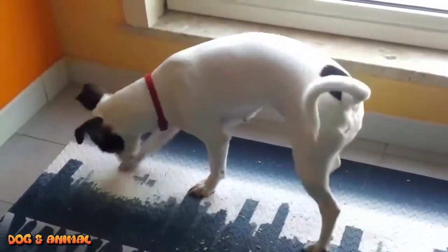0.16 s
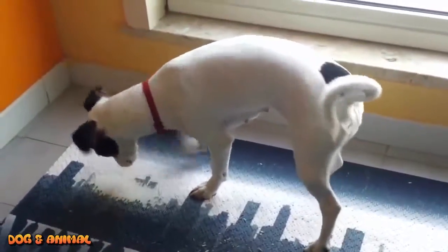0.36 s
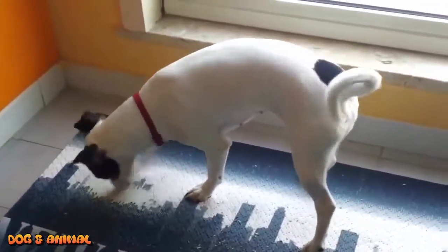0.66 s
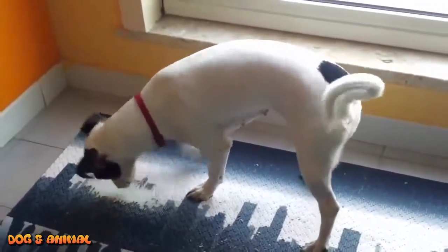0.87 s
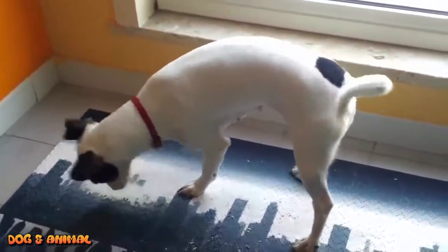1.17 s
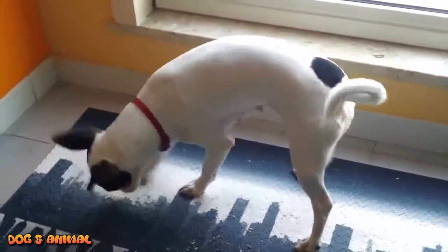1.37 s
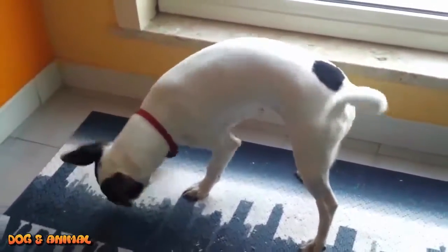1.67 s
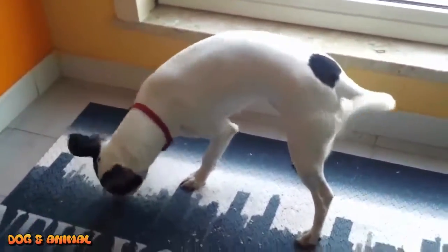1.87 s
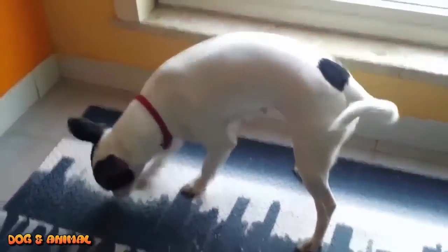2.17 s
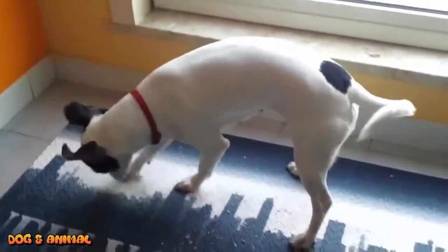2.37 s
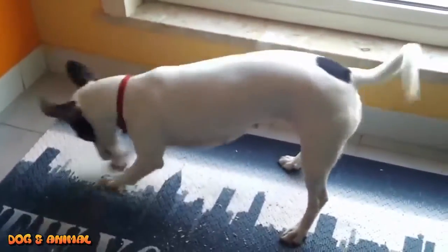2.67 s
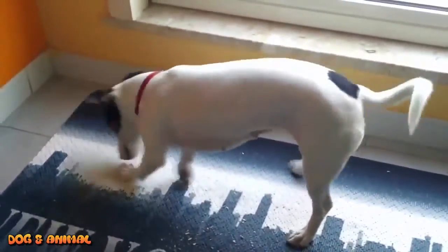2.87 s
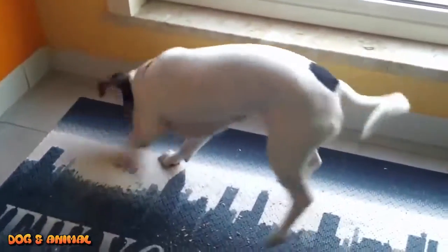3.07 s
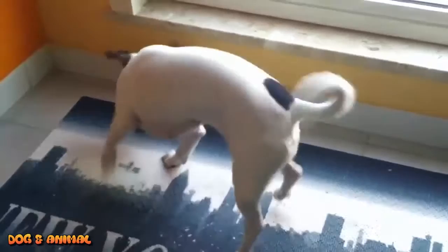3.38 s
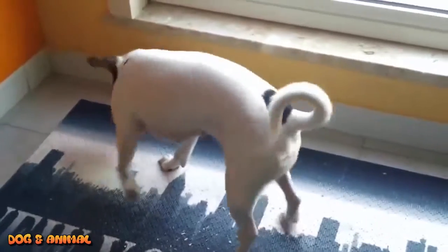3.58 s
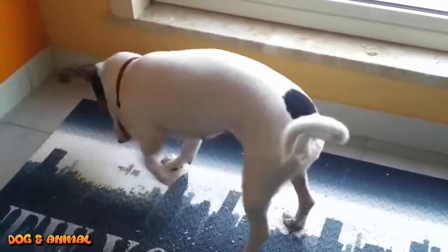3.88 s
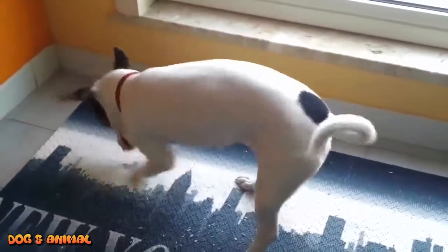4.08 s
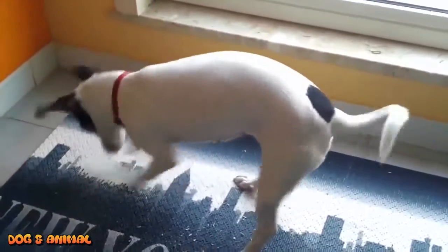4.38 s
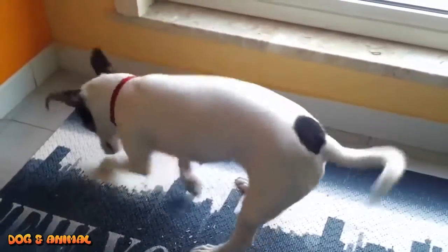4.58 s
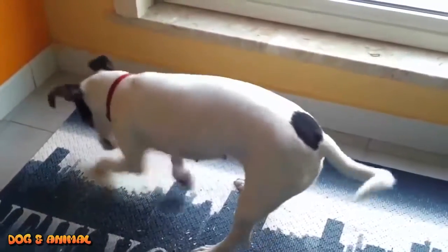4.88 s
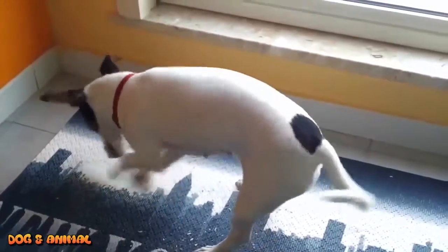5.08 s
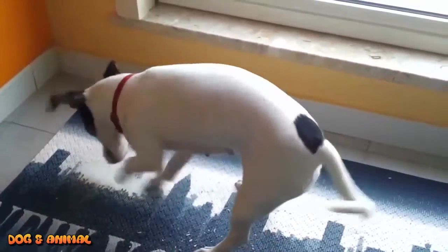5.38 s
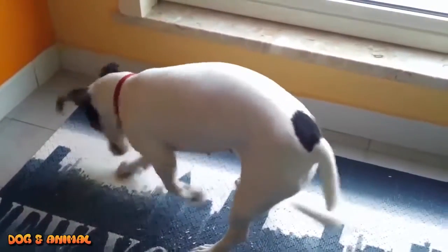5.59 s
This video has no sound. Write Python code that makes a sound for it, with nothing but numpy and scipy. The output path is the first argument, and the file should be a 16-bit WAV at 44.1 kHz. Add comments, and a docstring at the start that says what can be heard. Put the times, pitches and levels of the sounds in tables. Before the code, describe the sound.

A small dog scratches at a bristly doormat close by in a tiled room. From the start until about 2.7 seconds, hard single strokes come evenly, three or four a second. Each is a bright crackling drag that ends in a rasp and a sharp snap as the claws tear free, some with a short hoarse zip. Around 3 seconds the strokes turn a little lighter and less even, and a very faint, thin, high squeak glides upward at about 3.2 seconds. From roughly 4.4 seconds both paws alternate in a quick scrabble, about twice as fast, ending with a firmer rasping stroke near 5.7 seconds. Underneath, the pads rub with a quiet hollow sound, the mat knocks dully on the tiles now and then, and paws land softly around the first second and near 4 seconds. The walls add a short echo over a faint steady hush.

```python
"""The corner of a tiled room: a small dog digs at a bristly doormat, in single hard strokes at first,
then with both paws in turn. Each paw drags through the crackling pile until the claws tear free with
a snap; deep strokes rasp and zip over the weave. Underneath, the pad rubs with a hollow sound, the mat
knocks back on the tiles and a paw lands with a soft thud. The near walls ring briefly over a faint
hush, and one thin squeak slips out midway."""
import sys
import numpy as np
from scipy import signal
from scipy.fft import rfft, irfft, next_fast_len
from scipy.io import wavfile
from scipy.ndimage import uniform_filter1d

SR = 44100
rng = np.random.default_rng(int(sys.argv[2]) if len(sys.argv) > 2 else 0)


def generate_wav(signal):
    """Clip the signal to [-1, 1] and save it as 16-bit WAV at the path in sys.argv[1]."""
    frames = np.transpose(np.atleast_2d(signal))
    scaled = np.clip(frames, -1, 1) * 32767
    pcm = np.round(scaled).astype(np.int16)
    wavfile.write(sys.argv[1], SR, pcm)


N = 253218
TIME = np.arange(N) / SR

# paw strokes: (tear time [s], drag length [s], drag [dB], tear [dB], scuff [dB], rasp [dB], snap [dB])
PAW_STROKES = [(.049, 0.07, -43.5, -58, -82, -77, -53), (.121, 0.033, -37.5, -30, -51, -44, -11),
               (.447, 0.087, -38.5, -24.5, -45, -35, -6), (0.7136, 0.053, -34, -26.5, -49.5, -24.5, -3.5),
               (1.004, 0.075, -42.5, -26, -51.5, -23, -4), (1.2806, 0.052, -40, -25, -43.5, -23.5, -5.5),
               (1.562, 0.11, -46.5, -30.5, -62, -29, -8.5), (1.835, 0.045, -37.5, -24, -42, -26, -7.5),
               (2.098, 0.048, -38, -34.5, -43, -26, -10), (2.3808, .066, -39, -31, -61, -21, -5.5),
               (2.6889, 0.078, -40, -30, -50.5, -24, -1.5), (3.014, 0.085, -32.5, -37.5, -55, -64, -34),
               (3.149, .069, -37, -34, -47, -37, -14.5), (3.44, 0.069, -33, -39, -53, -39, -10),
               (3.705, 0.073, -33.5, -26.5, -45.5, -36.5, -10), (3.979, 0.061, -34.5, -24.5, -46, -36, -10),
               (4.266, 0.13, -35.5, -25.5, -48, -44, -14.5), (4.434, 0.061, -34, -41, -46.5, -34, -18),
               (4.52, 0.045, -32, -56, -79, -43, -37), (4.555, 0.012, -29.5, -34, -77, -35, -15.5),
               (4.704, 0.087, -31, -25, -73, -36, -14), (4.787, 0.035, -35, -37, -79, -40.5, -32),
               (4.846, 0.027, -32.5, -34, -79, -45, -17.5), (4.939, 0.032, -34, -31.5, -64, -47, -30),
               (4.993, .041, -34.5, -27.5, -58.5, -68, -19), (5.087, 0.036, -39, -33.5, -51.5, -43.5, -37),
               (5.132, 0.034, -37.5, -38, -74, -45, -11), (5.214, 0.044, -36.5, -31.5, -55, -45, -32),
               (5.272, 0.051, -34, -33.5, -59, -39, -9), (5.378, 0.047, -31.5, -45, -59, -43, -40),
               (5.4239, 0.017, -41, -35.5, -62, -41.5, -13.5), (5.52, 0.042, -30, -43, -69, -63, -29),
               (5.568, 0.024, -36, -42, -48.5, -34, -18), (5.697, 0.088, -32.5, -32.5, -47, -27.5, -7.5)]
# a stray claw snags a tuft: (time [s], rasp [dB], snap [dB])
CLAW_SNAGS = [(.2956, -56, -37), (.424, -30, -10.5), (0.684, -32.5, -12), (0.984, -30.5, -14.5),
              (1.5484, -33.5, -15), (1.8134, -47, -22), (2.3744, -44, -14), (2.6467, -63, -16),
              (2.9761, -56, -21), (3.051, -45, -17), (3.3214, -47.5, -22), (3.3828, -40.5, -13.5),
              (3.578, -45.5, -26.5), (3.9, -41.5, -19), (4.256, -35.5, -25), (4.4272, -45, -6),
              (4.835, -68, -10.5), (5.487, -65, -15.5)]
# tone of a snapping fibre: (frequency [Hz], level [dB])
SNAP_SPECTRUM = [(300, -68), (1400, 4), (3400, -16), (4400, 9), (5600, 13), (7800, 9.5), (9500, -0.5),
                 (15500, -102)]


def undb(db):
    """Decibels to gain."""
    return 10 ** (np.asarray(db) / 20)


def along(points, hz):
    """Read (Hz, value) points on a log-frequency axis."""
    at, value = np.transpose(points)
    return np.interp(np.log(np.maximum(hz, 1)), np.log(at), value)


def ring(x, response):
    """Pass x through a response scaled to unit energy."""
    return signal.fftconvolve(x, response / np.linalg.norm(response))[:N]


def colour(x, points, size=4096):
    """Causal filter with the given spectral shape, so that clicks keep a sharp front."""
    gain = undb(along(points, np.fft.rfftfreq(size, 1 / SR)))
    cepstrum = irfft(np.log(gain))
    cepstrum[1:size // 2] *= 2
    cepstrum[size // 2 + 1:] = 0
    return ring(x, irfft(np.exp(rfft(cepstrum))))


def resonate(x, resonances):
    """Ring a set of damped resonances with x."""
    t = TIME[:SR // 5]
    response = sum(undb(db) * width * np.exp(-np.pi * width * t) * np.cos(2 * np.pi * hz * t)
                   for hz, width, db in resonances)
    return ring(x, response)


def wander(rate):
    """Smooth random drift of unit spread that changes about rate times a second."""
    span = max(int(SR / rate), 1)
    x = uniform_filter1d(uniform_filter1d(rng.standard_normal(N), span), span)
    return x / x.std()


def crackle(rate, scatter_db, clump_db):
    """Fibres flicking past a claw: tiny clicks of uneven size that come in clumps; rms 1."""
    clicks = (rng.random(N) < rate / SR) * rng.choice([-1, 1], N)
    scatter = scatter_db * np.clip(rng.standard_normal(N), -2, 2)
    clumps = clump_db * np.clip(wander(330), -2, 2)
    x = clicks * undb(scatter + clumps)
    return x / x.std()


def hush():
    """A faint, slightly restless bed of noise."""
    # room tone: (frequency [Hz], level [dB])
    hush_spectrum = [(90, -37), (200, -14.5), (300, -15), (480, -23), (700, -22.5), (1400, -20.5),
                     (3000, -30), (6000, -21), (8500, -22.5), (11000, -40), (15500, -63)]
    return undb(-56.5 + 2.4 * wander(36)) * colour(rng.standard_normal(N), hush_spectrum)


def echoes(first_s=.0022, early_s=.012, build_s=.024, late_db=-4, bands=12):
    """The room's answer to one spot: a quick spatter off floor and corner, then the whole room's ring."""
    # decay of the tiled room: (frequency [Hz], time to fall 60 dB [s])
    decay_times = [(150, 1), (500, 0.46), (1200, 0.21), (2800, 0.38), (7000, 0.25), (13000, 0.3)]
    t = TIME[:SR * 2 // 3]
    early = rng.standard_normal(len(t)) * (t > first_s) * np.exp(-t / early_s)
    noise, hz = rfft(rng.standard_normal(len(t))), np.fft.rfftfreq(len(t), 1 / SR)
    centres = np.geomspace(decay_times[0][0], decay_times[-1][0], bands)
    late = 0
    for centre, pick in zip(centres, np.eye(bands)):
        band = irfft(noise * along(np.c_[centres, pick], hz), len(t))
        late += band * np.exp(-np.log(1000) * t / along(decay_times, centre))
    late *= 1 - np.exp(-t / build_s)
    return early / np.linalg.norm(early) + undb(late_db) * late / np.linalg.norm(late)


def room(x, moves_per_s=9, spots=4):
    """Direct sound and echoes; the paws move from spot to spot, so the echoes keep changing colour."""
    shares = np.array([wander(moves_per_s) for _ in range(spots)])
    shares /= np.linalg.norm(shares, axis=0)
    reflected = sum(signal.fftconvolve(x * share, echoes())[:N] for share in shares)
    return undb(-5) * (x + reflected)


def squeak(start_s=3.17, from_hz=9400, to_hz=11200, glide_s=.097, swell_s=.039, level_db=-60):
    """A faint, thin squeak glides up and dies away while the dog shifts its stance."""
    age = np.maximum(TIME - start_s, 0)
    glide = to_hz + (from_hz - to_hz) * np.exp(-age / glide_s)
    hz = glide * (1 + .002 * wander(300))
    swell = age / swell_s * np.exp(1 - age / swell_s)
    return undb(level_db) * swell * np.sin(2 * np.pi * np.cumsum(hz) / SR)


def steps(press_s=.023):
    """A soft pad lands on the mat with a dull thud."""
    # paw landings: (time [s], level [dB])
    landings = [(.314, -61), (.794, -53.5), (1.161, -56.5), (3.965, -54), (4.24, -58.5)]
    # tone of the thud: (frequency [Hz], level [dB])
    thud_spectrum = [(25, 17), (60, 2), (130, 6), (200, 4.5), (300, -10), (600, -0.5), (2000, -42)]
    push = np.zeros(N)
    for s, db in landings:
        age = np.clip((TIME - s) / press_s, 0, 20)
        push += undb(db) * age * np.exp(1 - age)
    return colour(push * rng.standard_normal(N), thud_spectrum)


def knocks(hollow_hz=660, swell_s=.0068, body_hz=300, body_db=-4):
    """The lifted mat drops on its cushion of air: a brief hollow note over the backing's dull body."""
    # the mat meets the tiles: (time [s], level [dB])
    drops = [(.422, -48), (.457, -60), (0.719, -46), (1.008, -50.5), (1.828, -51), (2.692, -47.5),
             (3.676, -44.5), (4.259, -50), (4.428, -51.5), (5.554, -56), (5.696, -51)]
    out = np.zeros(N)
    wobbly_time = np.cumsum(1 + .06 * wander(400)) / SR
    for s, db in drops:
        near = (TIME > s) & (TIME < s + 10 * swell_s)
        age, phase = (TIME[near] - s) / swell_s, 2 * np.pi * wobbly_time[near]
        tone = np.sin(hollow_hz * phase) + undb(body_db) * np.sin(body_hz * phase)
        out[near] += undb(db) * age * np.exp(1 - age) * tone
    return out


def rubs(unsteadiness=.15, landing_skew=.7):
    """The pad sticks and slips at an unsteady rate: a hollow rub that shakes the mat's backing."""
    # pad rubs: (middle [s], length [s], level [dB], slip rate [Hz])
    pad_rubs = [(0.425, 0.095, -43, 299.3), (0.738, 0.12, -49, 300), (1.006, 0.13, -49, 297),
                (1.291, 0.086, -41.5, 290), (1.538, 0.037, -51.5, 261), (1.822, 0.055, -46.5, 346),
                (2.097, 0.048, -49, 272), (2.388, 0.057, -46, 242), (2.69, 0.1, -50.5, 257),
                (3.009, 0.18, -49, 279), (3.152, 0.092, -47, 323.7), (3.696, 0.1, -45, 258),
                (3.936, 0.11, -43.5, 284), (4.216, 0.09, -43, 291), (4.427, 0.066, -50, 322),
                (4.575, 0.051, -48.5, 281), (4.638, 0.067, -48, 243), (4.691, 0.031, -48.5, 277),
                (4.797, 0.069, -52.5, 215), (4.933, 0.049, -49.5, 258), (5.002, 0.04, -53.5, 378),
                (5.258, 0.039, -45.5, 295), (5.386, 0.1, -52, 285), (5.553, 0.1, -50.5, 250),
                (5.693, 0.11, -46, 253.6)]
    # resonances of the backing: (frequency [Hz], width [Hz], level [dB])
    backing_modes = [(216.5, 14, 23), (289, 9.3, 16), (354, 8.9, -5), (646, 35, 1)]
    press, slips = np.zeros((2, N))
    wobbly_time = np.cumsum(np.exp(unsteadiness * wander(131))) / SR
    for s, length, db, hz in pad_rubs:
        near = np.abs(TIME - s) < length / 2
        progress = np.clip((TIME[near] - s) / length + .5, 0, 1)
        weight = undb(db) * np.sin(np.pi * progress ** landing_skew)  # comes on faster than it leaves
        press[near] += weight
        slips[near] += weight * np.sin(2 * np.pi * hz * wobbly_time[near])
    backing = resonate(press * crackle(rate=720, scatter_db=-.5, clump_db=9.5), backing_modes)
    return slips * undb(1.8 * wander(140)) + undb(-8.5) * backing


def zips(width_s=.005, slowing_per_s=4.21, overtone_db=-14):
    """A freed claw ticks over the weave's ribs so fast that it gives a hoarse chirp, slowing as it goes."""
    # claw skids: (middle [s], rib rate [Hz], level [dB])
    skids = [(.728, 3530, -23), (1.017, 2640, -23), (1.292, 3500, -17), (1.58, 2700, -20),
             (2.387, 1633, -27), (2.396, 2640, -17), (4.256, 2750, -29), (5.577, 2473, -20.5),
             (5.714, 2124, -20.5)]
    out = np.zeros(N)
    uneven = 1 + .08 * wander(2200)
    grip = undb(4 * np.clip(wander(900), -2, 2))
    for s, hz, db in skids:
        near = np.abs(TIME - s) < 4 * width_s
        t = TIME[near] - s
        phase = 2 * np.pi * np.cumsum(hz * uneven[near] * (1 - slowing_per_s * t)) / SR
        chirp = np.sin(phase) + undb(overtone_db) * np.sin(2 * phase)
        out[near] += undb(db) * np.exp(-.5 * (t / width_s) ** 2) * chirp
    return undb(-7) * out * grip


def snaps(pitch_hz=5900, pitch_spread=.1, stretch_s=.00089, click_s=.00024, spray_s=.0024):
    """A hooked tuft stretches and lets go with one sharp click, and its neighbours flick after it."""
    clicks, releases = np.zeros((2, N))
    t = TIME[:SR // 40]
    age = t - stretch_s
    pulse = np.exp(-.5 * (age / click_s) ** 2)
    for s, *_, db in list(PAW_STROKES) + list(CLAW_SNAGS):
        start = int(s * SR)
        hz = pitch_hz * np.exp(pitch_spread * rng.standard_normal())
        clicks[start:start + len(t)] += undb(db) * pulse * np.sin(2 * np.pi * hz * age)
        releases[int((s + stretch_s) * SR)] += undb(db)
    flicks = crackle(rate=6000, scatter_db=4, clump_db=1)
    spray = ring(releases, np.exp(-t / spray_s)) * flicks
    return undb(-2) * clicks + undb(6) * colour(spray, SNAP_SPECTRUM)


def dragging(touch, lift, landing_share=.98, swell_db=2, lift_s=.007):
    """Pressure of a dragging paw, 0-1: it lands, pulls ever harder and leaves quickly."""
    length = max(lift - touch, .005)
    landing = np.clip((TIME - touch) / (landing_share * length) + .5, 0, 1)
    slack = np.clip((lift - TIME) / length, 0, 1)
    release = np.exp(-np.clip((TIME - lift) / lift_s, 0, 20))
    return np.sin(np.pi / 2 * landing) ** 2 * undb(-swell_db * slack) * release


def rolling(touch, lift, early_s=.00093, late_s=.021):
    """Weight on the pad, 0-1: it rolls on just before the drag, peaks midway and rolls off just after."""
    progress = np.clip((TIME - touch + early_s) / (lift - touch + early_s + late_s), 0, 1)
    return (4 * progress * (1 - progress)) ** 1.3


def tearing(free, rise_s, hold_s=.0027, fall_s=.0049):
    """The burst of a tear, 0-1: tension mounts, the claws rip through, the last fibres let go."""
    age = TIME - free
    return np.exp(-np.clip(np.maximum(-age / rise_s, (age - hold_s) / fall_s), 0, 20))


def strokes(tear_rise_s=.014, abrupt_db=26, bite_lag_s=.0033):
    """Bristle, rasp and scuff envelopes: each stroke drags and then tears, and snags rasp on the way."""
    bristle, rasp, scuff = np.zeros((3, N))
    for free, length, drag_db, tear_db, scuff_db, rasp_db, snap_db in PAW_STROKES:
        # a firmly hooked claw lets go without warning: a snap abrupt_db over its tear halves the rise
        rise_s = tear_rise_s / (1 + undb(snap_db - tear_db - abrupt_db) ** 2)
        drag = dragging(free - length, free)
        pad = rolling(free - length, free)
        tear = tearing(free, rise_s)
        bite = tearing(free + bite_lag_s, rise_s) ** .91  # the rasp peaks just after the release
        bristle += np.hypot(undb(drag_db) * drag, undb(tear_db) * tear)
        rasp += np.hypot(undb(drag_db - 21) * drag, undb(rasp_db) * bite)
        scuff += undb(scuff_db) * np.hypot(undb(-4) * pad, undb(1) * tear)
    for s, rasp_db, _ in CLAW_SNAGS:
        rasp += undb(rasp_db) * tearing(s, rise_s=.0035)
    return bristle, rasp, scuff


def claw_angle(scrape, depth_db=3, changes_per_s=24.5, bands=12):
    """The claws' angle keeps shifting the colour of the scrape: each band swells and fades on its own."""
    centres = np.geomspace(700, 11000, bands)
    size = next_fast_len(N)
    spectrum, hz = rfft(scrape, size), np.fft.rfftfreq(size, 1 / SR)
    out = 0
    for pick in np.eye(bands):
        band = irfft(spectrum * along(np.c_[centres, pick], hz), size)[:N]
        gain = undb(depth_db * np.clip(wander(changes_per_s), -2, 2))
        out += band * gain / np.sqrt(np.mean(gain ** 2))
    return out


def scratching(bristle, rasp, scuff):
    """Bristles crackle, lone fibres tick above them, claws rasp on the weave and the pad scuffs along."""
    # bright crackle of the pile: (frequency [Hz], level [dB])
    pile_spectrum = [(500, -44.5), (1400, -30), (2300, -21.5), (3400, -3.5), (4200, -9), (5500, 2.5),
                     (6500, -2), (7800, 4), (8800, -5), (10000, -12.5), (11300, -11), (12300, -26.5),
                     (14400, -21.5), (15800, -87)]
    # midrange rasp of the weave: (frequency [Hz], level [dB])
    weave_spectrum = [(200, -82), (500, -14), (680, -9), (850, -9.5), (1100, 7), (1430, 7), (1750, 10),
                      (2050, 5), (2600, 11), (3500, 10.5), (7000, -5), (12000, -113)]
    # fixed resonances that ring in the rasp: (frequency [Hz], width [Hz], level [dB])
    rasp_modes = [(1430, 70, -1), (1740, 60, -2), (2645, 70, 1), (2950, 60, -5), (3450, 260, -6)]
    # darker scuff of the pad: (frequency [Hz], level [dB])
    pad_spectrum = [(150, -43), (300, 7.5), (480, -4.5), (660, 5.5), (1300, 13), (2200, 9), (5000, -20.5)]
    pile = colour(bristle * crackle(rate=7000, scatter_db=4.5, clump_db=2), pile_spectrum)
    weave = colour(rasp * crackle(rate=2000, scatter_db=1, clump_db=2), weave_spectrum)
    ringing = resonate(rasp * crackle(rate=2200, scatter_db=3, clump_db=2), rasp_modes)
    ticks = colour(bristle * crackle(rate=160, scatter_db=3, clump_db=1), SNAP_SPECTRUM)
    pad = colour(scuff * crackle(rate=1300, scatter_db=3, clump_db=3), pad_spectrum)
    return claw_angle(undb(1) * pile + weave + undb(-6) * ringing + undb(-11) * ticks + undb(4.5) * pad)


def scene():
    """The digging dog in its room; the dull sounds of the mat stay drier than the scratching."""
    sharp = scratching(*strokes()) + snaps() + zips()
    dull = rubs() + steps() + knocks() + knocks()  # two knock layers, each with its own wobble
    digging = room(sharp + undb(-9) * dull) + undb(-3) * dull
    return (digging + squeak() + hush())[None]


def record(dry, low_cut_hz=85, top_hz=15850):
    """A small microphone loses the deep bass, and a steep filter cuts the very top."""
    thin = signal.sosfilt(signal.butter(2, low_cut_hz, "high", fs=SR, output="sos"), dry)
    return signal.sosfilt(signal.ellip(8, .2, 70, top_hz, fs=SR, output="sos"), thin)


dry = scene()
out = record(dry)
generate_wav(out)
```